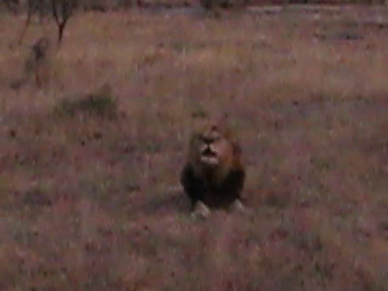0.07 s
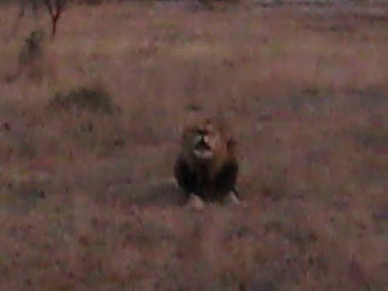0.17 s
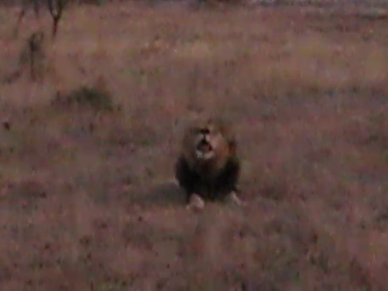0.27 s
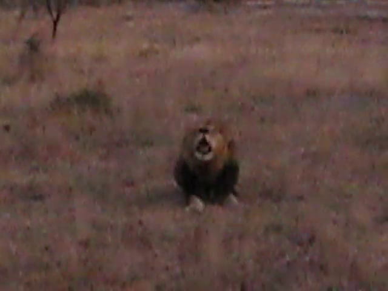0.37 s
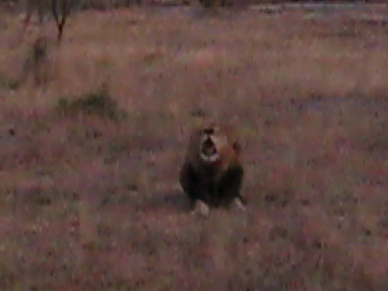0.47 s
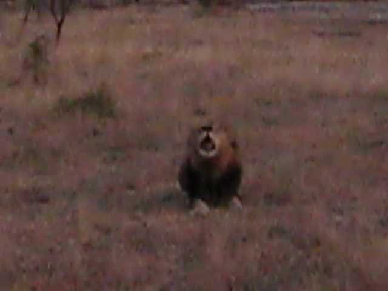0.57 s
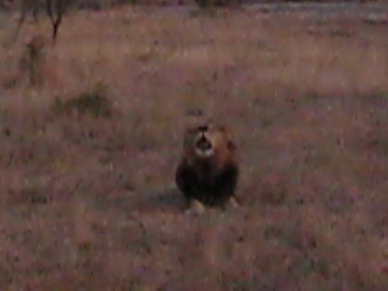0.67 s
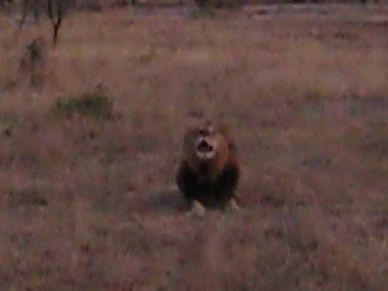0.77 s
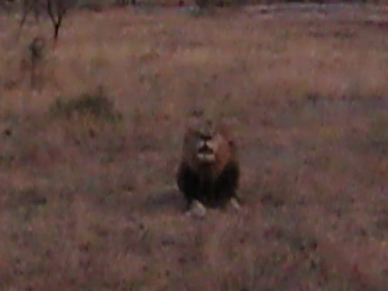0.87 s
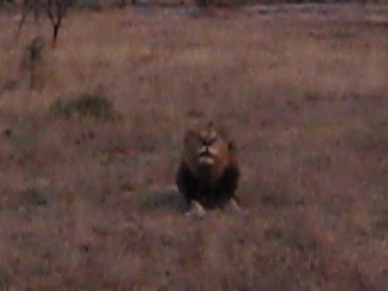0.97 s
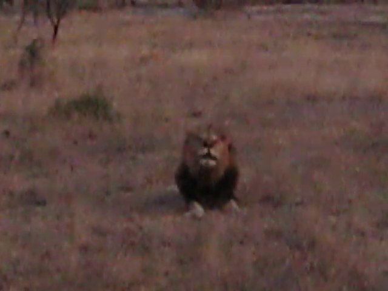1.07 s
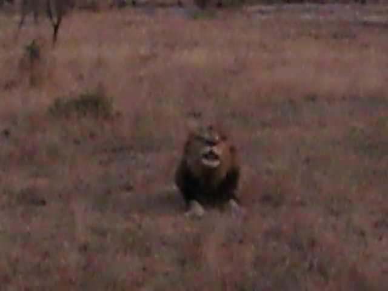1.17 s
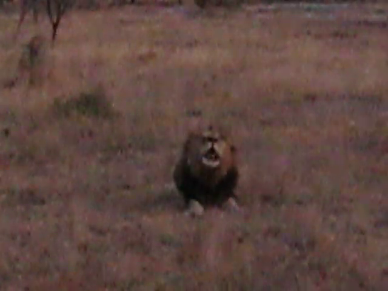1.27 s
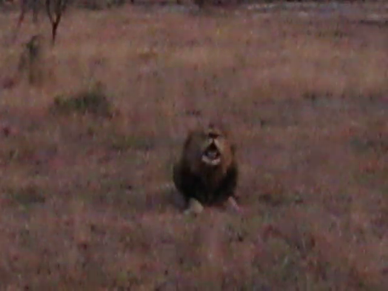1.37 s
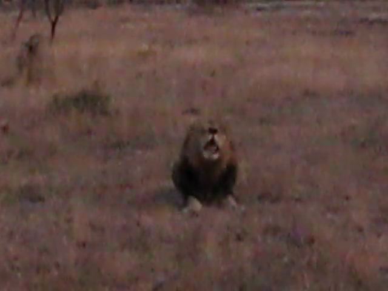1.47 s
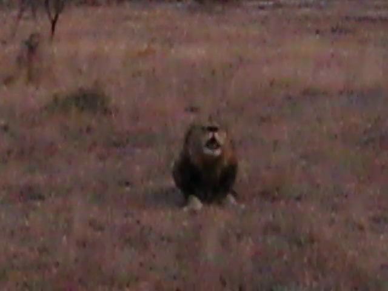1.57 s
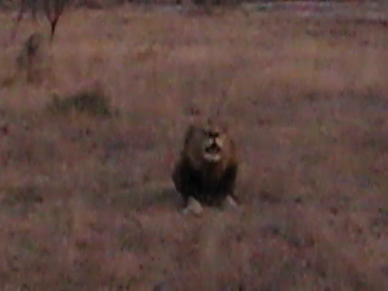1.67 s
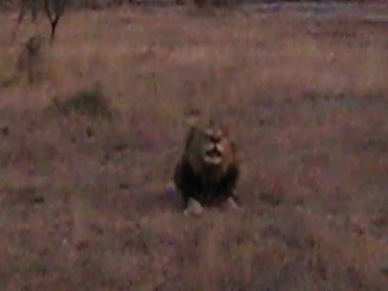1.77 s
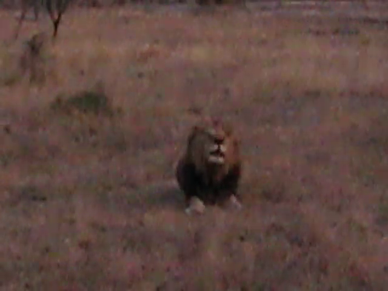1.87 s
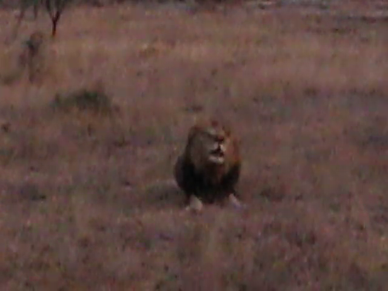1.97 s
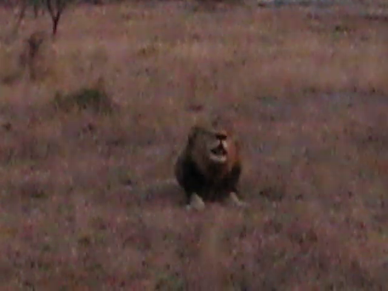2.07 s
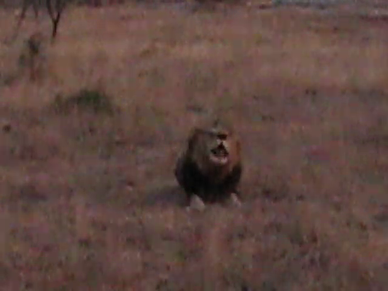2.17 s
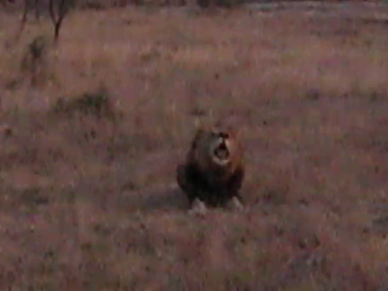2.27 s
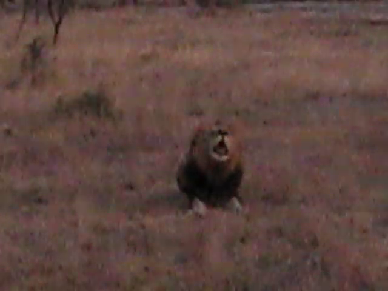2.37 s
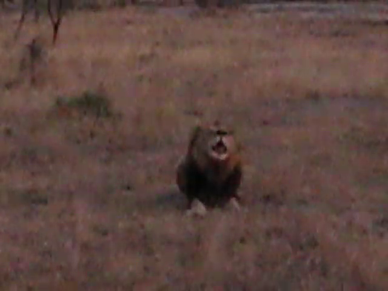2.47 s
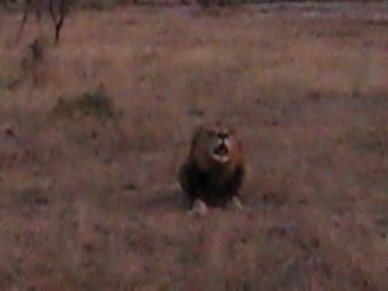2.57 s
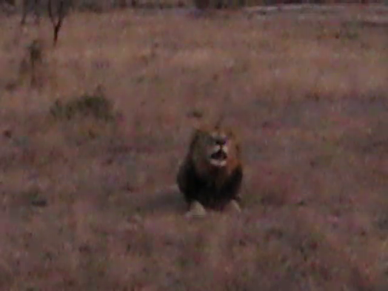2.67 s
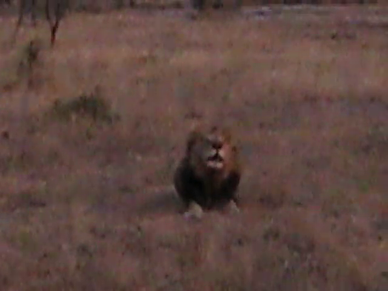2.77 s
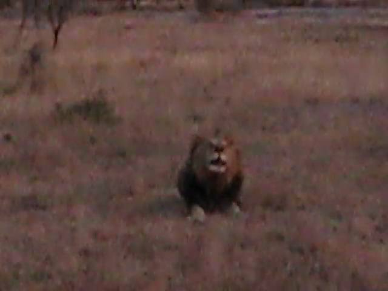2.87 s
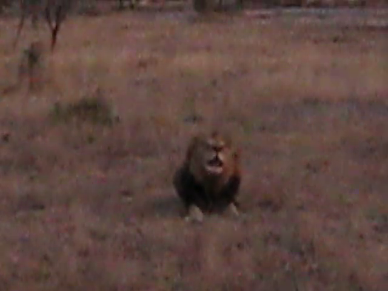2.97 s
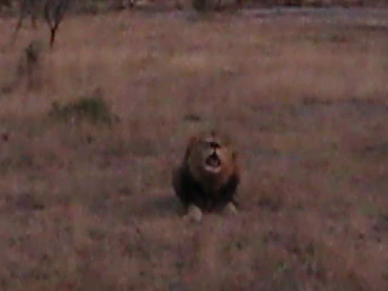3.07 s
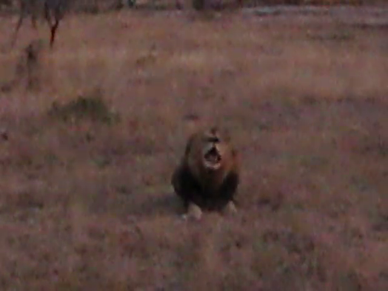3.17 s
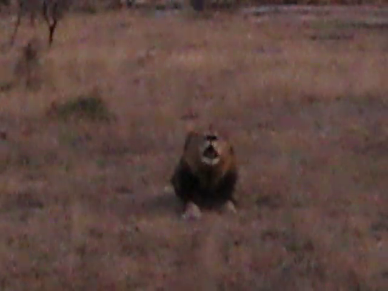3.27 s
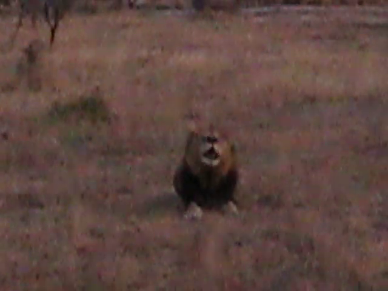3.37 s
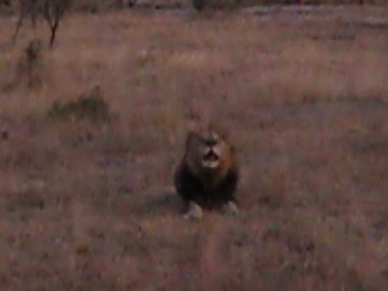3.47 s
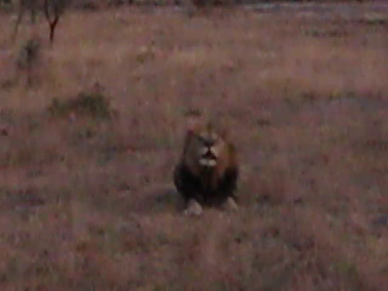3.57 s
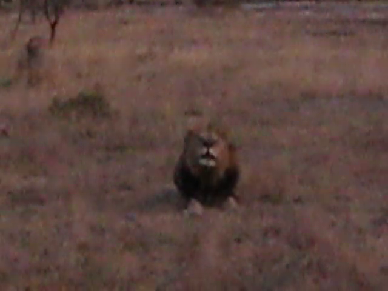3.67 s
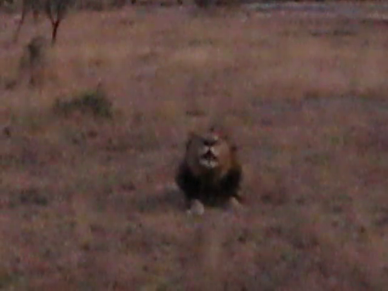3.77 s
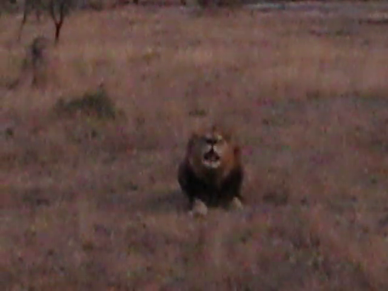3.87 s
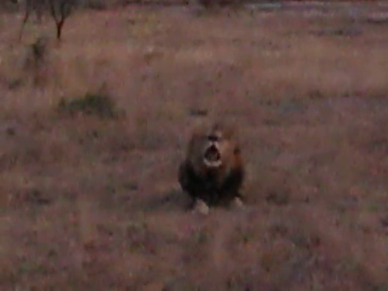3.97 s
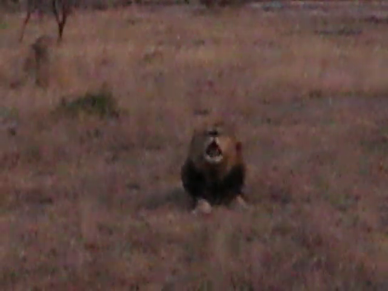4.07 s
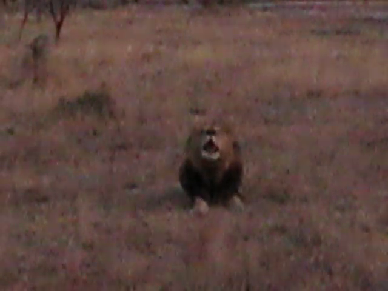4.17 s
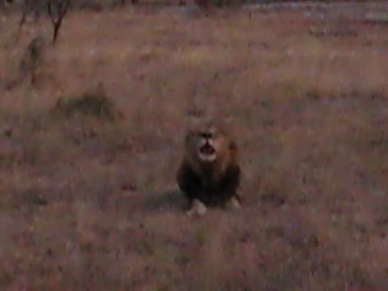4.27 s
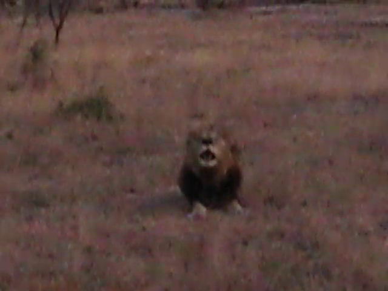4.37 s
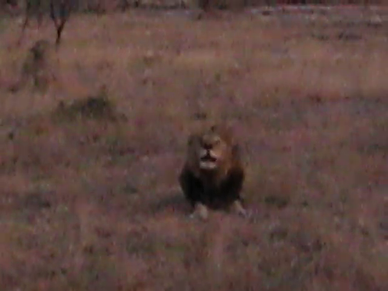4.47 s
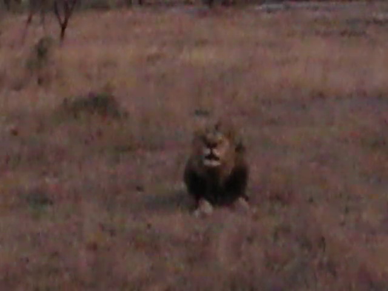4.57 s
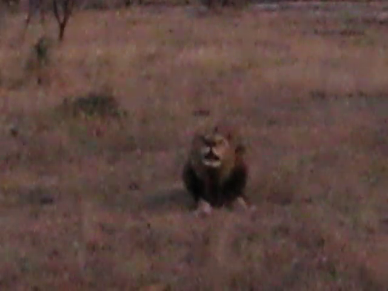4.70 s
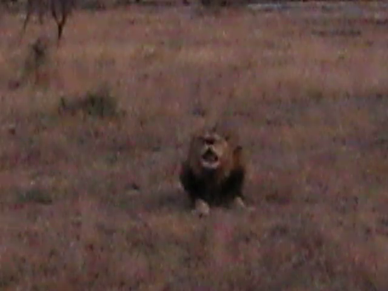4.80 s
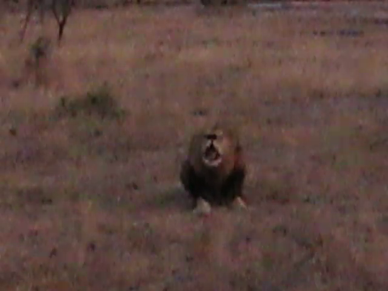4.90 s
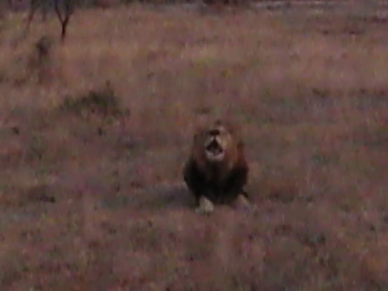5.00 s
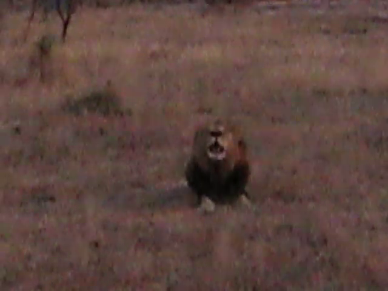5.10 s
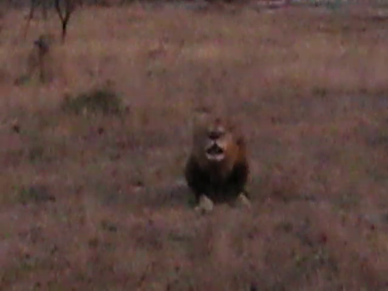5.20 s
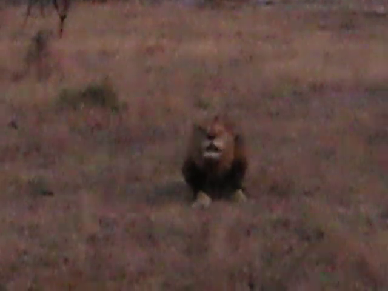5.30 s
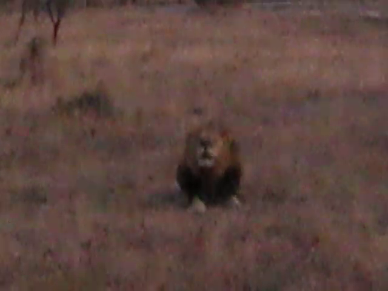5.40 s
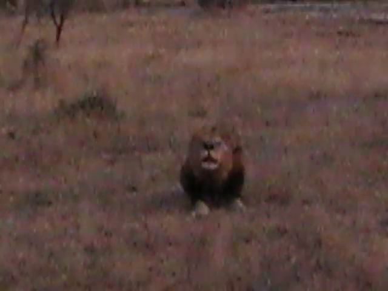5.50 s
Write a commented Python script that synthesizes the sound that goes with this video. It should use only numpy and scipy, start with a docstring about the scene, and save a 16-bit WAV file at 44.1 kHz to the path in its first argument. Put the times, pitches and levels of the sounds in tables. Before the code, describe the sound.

Raspy breath in, hard low roar, loose rattle: a lion repeats this pattern six times, the first roar longest, then draws breath once more. The voice is powerful, rough and dry, with only a faint tail from the open plain. Behind it lie quiet steady hiss, very thin high whines, a distant high trill and a few tiny ticks, in a plain single-channel pickup.

```python
"""Lion roaring in grassland

A male lion gives six grunting roars, each led by a rasping intake; a seventh intake begins at the end.
Pulsed folds and a deep, sagging chest tone start with a hard push, then give way to slowing, loose flaps.
Noise and pulses ring through a moving throat filter; decaying noise tails add faint echoes.
Beneath lie shaped hiss, thin whines, a far trill and small ticks.
"""
import sys
import numpy as np
from scipy import signal
from scipy.fft import rfft, irfft, next_fast_len
from scipy.io import wavfile
from scipy.ndimage import uniform_filter1d, map_coordinates

SR = 44100
rng = np.random.default_rng(int(sys.argv[2]) if len(sys.argv) > 2 else 0)


def transcribe(u):
    """Save the signal u as a 16-bit wav file named by the first command-line argument.

    u: samples, shape (n,) or (channels, n), limited to [-1, 1]; the rate is SR.
    q: integer samples, one column per channel.
    """
    v = np.clip(np.atleast_2d(u).T, -1, 1)
    q = np.round(v * 32767).astype(np.int16)
    wavfile.write(sys.argv[1], SR, q)


N = 244314
T = np.arange(N) / SR
SIZE = next_fast_len(N + SR, True) // 2 * 2
HZ = np.maximum(np.arange(SIZE // 2 + 1) * SR / SIZE, 1)
CUTOFF_HZ = 15800

# hiss spectrum: f/Hz, relative level/dB
AIR = [(25, -3), (90, -4), (135, 14), (200, -2), (600, -2.5), (2000, 0), (3000, -2.5), (6200, -3),
       (8700, -8), (10700, -6), (11600, -2.5), (12900, -8), (14400, -3), (15800, -2)]
AIR_DB = -48
# thin steady whines: f/Hz, half-width/Hz, level/dB
WHINES = [(7560, 30, -69), (15145, 10, -65.5)]
# something small and far away trills: start t/s, end t/s, level/dB
TRILLS = [(1.66, 2.06, -56), (3.40, 3.71, -57), (4.82, 5.36, -57.5)]
# downward slide of each trill note: from f/Hz, to f/Hz
TRILL_BAND = (6800, 6100)
# ticks and peeps in the grass: t/s, f/Hz, width/Hz, 1/e half length/s, level/dB
TICKS = [(2.7, 2500, 110, 0.011, -45.5), (2.714, 8600, 1800, 0.0027, -47), (5.277, 2120, 396, 0.0037, -44),
         (5.276, 3160, 660, 0.0039, -44.5)]

# intakes of air: fully drawn t/s, throat closes t/s, chest level/dB, throat level/dB, rasp level/dB
INTAKES = [(0.123, 0.331, -33.5, -33, -32.5), (1.18, 1.319, -37.5, -34, -34),
           (2.031, 2.209, -34.5, -33.5, -34.5), (2.946, 3.080, -38.5, -34, -35),
           (3.763, 3.938, -41.5, -34.5, -37.5), (4.695, 4.832, -39.5, -35.5, -38),
           (5.570, 5.700, -34, -32.5, -36)]
# intake slopes: chest, throat, rasp [dB/s]
SWELL_DB_PER_S = (193, 170, 270)
HOLD_DB_PER_S = (11, 26.5, 2)
SHUT_DB_PER_S = (252, 566, 550)

# roars: start t/s, hardest push t/s, folds lose their beat t/s, release t/s,
# pressed f/Hz, settled f/Hz, f at the break/Hz,
# relative chest level/dB, throat level/dB, rasp level/dB, overtone level/dB
ROARS = [(0.404, 0.428, 0.7, 0.83, 131, 150, 129.9, 1, 0, -0.5, -29),
         (1.389, 1.412, 1.590, 1.674, 132.6, 144.1, 131, 0, 0, -0.5, -35),
         (2.276, 2.302, 2.454, 2.588, 132.3, 141.7, 134.9, -0.5, -0.5, 1, -32),
         (3.144, 3.187, 3.26, 3.404, 125.2, 141.1, 138.9, 0, 0.5, -0.5, -23),
         (3.997, 4.049, 4.215, 4.340, 124, 141, 138.2, -0.5, 0, 0.5, -23),
         (4.895, 4.942, 5.06, 5.174, 124, 142.2, 127.2, -0.5, 0.5, 0, -25.5)]
# envelopes shared by all roars: level/dB at start, push, settled, break, mid rattle, release; fall/(dB/s)
CHEST_ENVELOPE = (-24.5, -17.5, -16, -21, -28, -29.5, 212)
THROAT_ENVELOPE = (-20.5, -15.5, -22, -24, -27, -31.5, 236)
RASP_ENVELOPE = (-33.5, -21, -28.5, -30, -27, -34.5, 280)
ATTACK_DB_PER_S, SETTLE_S = 2500, 0.031
# brief dip in the first, longest roar: t/s, 1/e half length/s, level change/dB
FALTER = (0.603, 0.022, -7.5)
# pitch leaps after the push, sags, and hovers once the beat is lost
PITCH_LEAP_S, SAG_POWER, LOOSE_HZ, LAST_HZ = 0.03163, 1.6, 139.2, 128.17
# overtones of the pressed voice: multiple of the pitch, relative level/dB
OVERTONES = [(2, -8), (3, 5), (4, -11.5), (5, -4.5), (6, -15), (9, -12), (11, -12)]
# side tones of the unsteady folds, and one stretch of the third harmonic (2.33 s):
# start t/s, end t/s, from f/Hz, to f/Hz, level/dB
SIDE_TONES = [(0.578, 0.652, 181, 185, -25.5), (0.617, 0.65, 515, 470, -24.5),
              (0.587, 0.697, 280, 251, -30.5), (0.663, 0.72, 351, 322, -30), (0.719, 0.79, 245, 356, -27.5),
              (1.525, 1.596, 177.7, 195, -25.5), (2.33, 2.466, 425, 400, -31.5),
              (3.137, 3.23, 215.7, 197, -27), (4.22, 4.302, 334, 254.4, -33.5),
              (5.06, 5.125, 305, 350.7, -36)]

# single hard slaps of the folds: t/s, relative throat level/dB, relative rasp level/dB
SLAPS = [(0.253, -22.5, -32), (0.274, -24.5, -30), (0.328, -19.5, -19.5), (0.412, -17, -43),
         (0.427, -22, -38), (1.187, -23.5, -31.5), (2.152, -20.5, -23.5), (2.181, -15, -22.5),
         (2.31, -26, -26), (3.032, -24, -45), (3.061, -48, -25.5), (3.089, -26, -29.5), (3.171, -24, -35),
         (3.266, -21, -38), (4.017, -19, -48), (4.28, -22, -34), (4.807, -28, -29.5), (4.937, -14, -44),
         (5.048, -22, -44)]
# flaps ending each roar: last hard flap t/s, relative throat level/dB, relative rasp level/dB
FLAP_RUNS = [(0.839, -1.5, -1), (1.687, 1, 2.5), (2.589, 1.5, 2), (3.402, 1.5, -2), (4.337, 0.5, 0.5),
             (5.174, -1.5, -4.5)]
# gap before the last hard flap; each earlier gap is shorter by the share
LAST_GAP_S, GAP_SHARE = 0.0305, 0.88
# course along a run: relative level/dB at the break, middle, last hard flap, feeble flap after it
FLAP_THROAT_DB = (-25.5, -18.5, -21, -35)
FLAP_RASP_DB = (-25.5, -22.5, -29.5, -38)

# source spectra: f/Hz, relative level/dB
PULSE_COLOUR = [(100, -40.5), (200, 2.5), (280, -7), (400, -2.5), (800, -11), (1200, -11), (2400, -35),
                (5000, -38), (7500, -27), (10500, -21.5), (15000, -31)]
RASP_COLOUR = [(100, 11.5), (190, 13.5), (280, 8), (450, 2), (800, 2.5), (1200, 1), (2400, -5),
               (5000, -12.5), (7500, -13), (10500, -18.5), (15000, -28)]
INTAKE_COLOUR = [(100, 20.5), (190, -3.5), (260, -9), (500, -7.5), (800, -5), (1100, -6), (1500, -4),
                 (2400, -9), (5000, -12.5), (7500, -15), (10500, -14), (15000, -34)]
FLAP_COLOUR = [(100, -10), (300, -1), (500, -5), (800, -6.5), (1150, -7.5), (1800, -6.5), (2400, -11),
               (5000, -15), (7500, -21.5), (10500, -20.5), (15000, -32)]
CHEST_COLOUR = [(25, -47), (50, -11.5), (90, -13.5), (125, -4.5), (165, 4.5), (200, -14), (260, -53),
                (500, -38)]
# throat half closed, for rattle and flaps: f/Hz, width/Hz, lift/dB
THROAT = [(316.5, 18, 10), (499.5, 27, 10), (627, 32, -18), (740, 60, 8.5), (840, 150, 0), (1077, 128, 13),
          (1290, 220, 11.5), (1530, 110, -4.5), (1670, 120, 11), (1825, 58, 10.5), (2110, 95, -9.5),
          (2400, 45, 6), (2980, 280, 7), (3810, 950, 11.5), (4197, 100, 8), (4820, 270, -5.5),
          (5100, 69, 12), (5760, 170, 7.5), (6240, 330, 5.5)]
# throat and mouth wide open, for the voice: f/Hz, width/Hz, lift/dB
OPEN_THROAT = [(368.7, 43, 14), (512, 15, 9), (601.3, 12, 11.5), (704, 72, 5.5), (916, 69, -11),
               (1016, 140, 6), (1169, 265, 10.5), (1290, 56, 3), (1425, 58, 9), (1602, 67, -26),
               (1705, 377, 22), (1974, 215, 12), (2250, 124, 13), (2480, 170, 4.5), (3023, 740, 18.5),
               (3530, 620, 7.5), (4155, 880, 19.5), (5440, 2040, 19.5)]
# throat narrowed, for the intakes: f/Hz, width/Hz, lift/dB
NARROW_THROAT = [(360.5, 87, 17.5), (702, 59, 9), (820, 32, -10), (1027, 520, 12), (1335, 370, 5.5),
                 (1680, 48, 11), (2395, 65, 5), (2650, 110, -8), (3074, 500, 13), (3410, 64, 9.5),
                 (4120, 830, 17), (5100, 400, -2.5), (5550, 470, 8), (6100, 400, 6.5)]


def from_db(db):
    """Decibels to gain."""
    return 10 ** (np.asarray(db) / 20)


def rms_one(x):
    """Scale to unit power."""
    return x / np.sqrt(np.mean(x ** 2) + 1e-20)


def noise():
    """White noise."""
    return rng.standard_normal(N)


def band(x, low_hz, high_hz, order=2):
    """Butterworth band-pass."""
    edges_hz = [low_hz, min(high_hz, SR / 2 - 1000)]
    return signal.sosfilt(signal.butter(order, edges_hz, "band", fs=SR, output="sos"), x + 1e-18)


def drift(rate_hz):
    """Random wander of unit power, 6 dB down at rate_hz."""
    coarse = 2 ** 14
    coarse_hz = np.arange(coarse // 2 + 1) / T[-1]
    spectrum = rfft(rng.standard_normal(coarse)) / (1 + (coarse_hz / rate_hz) ** 2)
    return np.interp(T, np.linspace(0, T[-1], coarse), rms_one(irfft(spectrum)))


def even(x, size=1100):
    """Hold the level steady over `size` samples, keeping the faster pulses within."""
    power = uniform_filter1d(uniform_filter1d(x ** 2, size), size)
    return x / np.sqrt(power.clip(1e-12))


def colour(x, spectrum, resonances=()):
    """Causal (minimum-phase) filter: a smooth spectrum lifted by resonances."""
    hz, db = np.transpose(spectrum)
    db = np.interp(np.log(HZ), np.log(hz), db)
    for centre_hz, width_hz, lift_db in resonances:
        db = db + lift_db / (1 + (2 * (HZ - centre_hz) / width_hz) ** 2)
    cepstrum = irfft(np.log(from_db(db)))[:SIZE // 2]
    cepstrum[1:] *= 2  # fold to minimum phase
    return irfft(rfft(x, SIZE) * np.exp(rfft(cepstrum, SIZE)))[:N]


def wavering(pitch_hz, width_hz):
    """Turbulence ringing in one narrow resonance, whose centre may move."""
    turn = 2 * np.pi * np.cumsum(pitch_hz * np.ones(N)) / SR
    return drift(width_hz) * np.cos(turn) + drift(width_hz) * np.sin(turn)


def registers(x, split_hz=2400):
    """The hollow lower part and the rasping upper part of a throat sound."""
    return band(x, 147, split_hz, order=4), band(x, split_hz, CUTOFF_HZ, order=4)


def jaw(spans, first, last, wobble=.012):
    """Relative shift of the resonances, gliding from first to last within each (start, end) span."""
    return np.interp(T, np.ravel(spans), [first, last] * len(spans)) + wobble * drift(7.03)


def tract(x, spectrum, resonances, opening, patchy_db=3.5, patchy_hz=22, count=12):
    """Moving throat filter: a wider jaw raises every resonance, and each region flickers on its own."""
    samples = np.arange(N)
    stretched = np.cumsum(1 + opening - opening.mean())
    # warp time, filter, unwarp: the fixed resonances then move
    warped = map_coordinates(x, [np.interp(samples, stretched, samples)], order=3)
    ringing = colour(warped, spectrum, resonances)
    whole = rfft(map_coordinates(ringing, [stretched], order=3), SIZE)
    centres = np.log(np.geomspace(300, 11000, count))
    out = np.zeros(N)
    for share in np.eye(count):
        region = irfft(whole * np.interp(np.log(HZ), centres, share))[:N]
        out += region * from_db(patchy_db * drift(patchy_hz))
    return out


def background(trill_hz=64.0):
    """Filtered-noise hiss, thin whines, a far trill of sliding notes and short noise ticks."""
    out = from_db(AIR_DB) * rms_one(colour(noise(), AIR))
    for hz, half_width_hz, db in WHINES:
        out += from_db(db) * wavering(hz, half_width_hz)
    note = trill_hz * T % 1
    turn = 2 * np.pi * np.cumsum(np.interp(note, [0, 1], TRILL_BAND)) / SR
    trill = rms_one(np.sin(turn) * np.sin(np.pi * note) ** 2 * from_db(2 * drift(30)))
    for start, end, db in TRILLS:
        fade = np.interp(T, [start, start + 0.06, end - .04, end], [0, 1, 1, 0])
        out += from_db(db) * trill * fade
    for s, hz, width_hz, length_s, db in TICKS:
        tick = rms_one(band(noise(), hz - width_hz / 2, hz + width_hz / 2))
        out += from_db(db) * tick * np.exp(-((T - s) / length_s) ** 2)
    return out


def intake_gains():
    """Chest, throat and rasp gains of the intakes: a swell, a hold and a quick shutting."""
    out = np.zeros((3, N))
    for full, end, *levels_db in INTAKES:
        for k, db in enumerate(levels_db):
            hold_db = HOLD_DB_PER_S[k] * (T.clip(full, end) - full)
            swell_db = SWELL_DB_PER_S[k] * (full - T).clip(0)
            shut_db = SHUT_DB_PER_S[k] * (T - end).clip(0)
            out[k] += from_db(db + (hold_db - swell_db - shut_db).clip(-120))
    return out


def intakes(flutter_db=2.5, flutter_hz=70, level_db=-2.5, hum_hz=160, hum_db=-2, rumble_db=-6,
            from_hz=880, to_hz=1200, hollow_db=-8, wheeze_hz=4130, wheeze_db=-9, lead_s=0.1):
    """Air drawn past slack folds: they hum and wheeze, and a mouth resonance rises as the jaw opens."""
    chest, throat, rasp = intake_gains()
    spans = [(full - lead_s, end) for full, end, *_ in INTAKES]
    opening = jaw(spans, first=-0.038, last=.02)
    flutter = from_db(flutter_db * drift(flutter_hz))
    low, high = registers(tract(noise() * flutter, INTAKE_COLOUR, NARROW_THROAT, opening))
    mouth_hz = np.interp(opening, [opening.min(), opening.max()], [from_hz, to_hz])
    hollow = from_db(hollow_db) * even(wavering(mouth_hz, 63))
    whistle = even(wavering(wheeze_hz * (1 + opening), 220) * flutter)
    wheeze = from_db(wheeze_db + 0.82 * drift(24)) * whistle
    hum = from_db(hum_db) * even(wavering(hum_hz, 17.7))
    rumble = from_db(rumble_db) * even(colour(noise(), CHEST_COLOUR))
    air = throat * (even(low) + hollow) + rasp * (even(high) + wheeze)
    return chest * (hum + rumble) + from_db(level_db) * air


def echo_tail(t60_s, low_hz, high_hz):
    """Unit-energy band of decaying noise with a soft onset."""
    decay = from_db(-60 * T / t60_s)
    onset = 1 - np.exp(-T * 30 / t60_s)
    echoes = band(noise() * decay * onset, low_hz, high_hz)
    return echoes / np.linalg.norm(echoes)


def plain(x, near_db=-18, near_t60_s=0.12, far_db=-42, far_t60_s=1.34, boom_db=-58):
    """Ground and grass scatter briefly; far bushes send back a faint, low tail."""
    near = from_db(near_db) * echo_tail(near_t60_s, 190, 5800)
    far = from_db(far_db) * echo_tail(far_t60_s, 145.0, 1100)
    boom = from_db(boom_db) * echo_tail(far_t60_s, 89, 160)
    return signal.fftconvolve(x, near + far + boom)[:N]


def roar_spans(tail_s=0.084):
    """Start and end of each roar, with its dying tail."""
    return [(start, end + tail_s) for start, _, _, end, *_ in ROARS]


def flap_runs(count=7):
    """Ever slower flaps ending each roar, the last one feeble: rows of t/s, throat/dB, rasp/dB."""
    before_last = np.append(0, np.cumsum(LAST_GAP_S * GAP_SHARE ** np.arange(count)))
    rows = []
    for (_, _, loose, *_), (last, throat_db, rasp_db) in zip(ROARS, FLAP_RUNS):
        feeble = last + LAST_GAP_S / GAP_SHARE
        stages = [loose, (loose + last) / 2, last, feeble]
        for s in [feeble, *(last - before_last)]:
            if s > loose:
                low_db = throat_db + np.interp(s, stages, FLAP_THROAT_DB)
                high_db = rasp_db + np.interp(s, stages, FLAP_RASP_DB)
                rows.append((s, low_db, high_db))
    return rows


def flaps(decay_s=0.0068, snap=1.0, throat_db=1.0, rasp_db=1.5, low_cut_hz=300, patchy_db=1.66):
    """Each slap of the folds is a click and a short burst of air that ring the throat."""
    burst = even(band(noise(), low_cut_hz, CUTOFF_HZ), size=90)
    drive = np.zeros((2, N))
    age = np.arange(SR // 20) / SR
    for s, low_db, high_db in SLAPS + flap_runs():
        at = round(s * SR)
        puff = burst[at:at + len(age)] * np.exp(-age / decay_s)
        puff[0] += snap
        drive[:, at:at + len(age)] += from_db([[low_db + throat_db], [high_db + rasp_db]]) * puff
    # scale each register so that a steady stream of air would have unit power
    steady = registers(colour(burst, FLAP_COLOUR, THROAT))
    opening = jaw(roar_spans(), first=0.029, last=-0.018)
    out = np.zeros(N)
    for k in range(2):
        ringing = registers(tract(drive[k], FLAP_COLOUR, THROAT, opening, patchy_db))[k]
        out += ringing / np.std(steady[k])
    return out


def roar_gain(envelope, level_column):
    """One gain curve for all roars: sharp attack, push, settled tone, rattle, release."""
    *stage_db, release_db_per_s = envelope
    out = np.zeros(N)
    for row in ROARS:
        start, push, loose, end = row[:4]
        stages = [start, push, push + SETTLE_S, loose, (loose + end) / 2, end]
        edges_db = ATTACK_DB_PER_S * (start - T).clip(0) + release_db_per_s * (T - end).clip(0)
        out += from_db(row[level_column] + np.interp(T, stages, stage_db) - edges_db.clip(0, 120))
    return out


def fold_pitch():
    """Low while pressed, a leap as the folds settle, then an ever faster sag until they lose their beat."""
    points, share = [], np.linspace(0, 1, 5)
    for _, push, loose, end, pressed_hz, settled_hz, break_hz, *_ in ROARS:
        settled = push + PITCH_LEAP_S
        sag_s = settled + (loose - settled) * share
        sag_hz = settled_hz + (break_hz - settled_hz) * share ** SAG_POWER
        points += [(push, pressed_hz), *zip(sag_s, sag_hz)]
        points += [((loose + end) / 2, LOOSE_HZ), (end, LAST_HZ)]
    return np.interp(T, *np.transpose(points))


def voice(cycles, pitch, pressed, opening, shimmer_db=2.5, slip=0.036, pressed_air_db=-9,
          eased_air_db=-1, closing=0.73, air_from_hz=520):
    """Regular beating: an uneven closure and an air puff per cycle, breathier as the push eases."""
    slipping = np.maximum.accumulate(cycles + slip * drift(90))
    closures = np.diff(np.floor(slipping), prepend=0) * np.sqrt(SR / pitch)
    closures = band(closures, 110, 1550) * from_db(shimmer_db * drift(82))
    puffs = rms_one(noise() * np.exp(-closing * (cycles % 1)) * from_db(shimmer_db * drift(190)))
    air_db = eased_air_db + (pressed_air_db - eased_air_db) * pressed
    air = from_db(air_db) * band(puffs, air_from_hz, SR / 2, order=1)
    low, high = registers(tract(closures + air, PULSE_COLOUR, OPEN_THROAT, opening))
    return even(low), even(high)


def rattle(opening, flap_hz=62, unevenness=.3, closing=0.77, size_db=2.5):
    """Slack folds flap slowly and unevenly, chopping the air into bursts; lower and upper register."""
    cycles = np.cumsum(flap_hz * np.exp(unevenness * drift(40))) / SR
    bursts = noise() * np.exp(-closing * (cycles % 1)) * from_db(size_db * drift(50))
    low, high = registers(tract(bursts, RASP_COLOUR, THROAT, opening))
    return even(low), even(high)


def roars(jitter=.012, broken_jitter=0.0597, push_s=0.018, held_db=-13, voice_db=-2.5, rattle_db=-4,
          rumble_db=-22, broken_rumble_db=-8, growl_db=-19):
    """A deep chest tone under the pulsed voice, which gives way to a rattle as the folds lose their beat."""
    falter_s, half_s, dip_db = FALTER
    falter = from_db(dip_db * np.exp(-((T - falter_s) / half_s) ** 2))
    chest = roar_gain(CHEST_ENVELOPE, 7) * falter
    throat = roar_gain(THROAT_ENVELOPE, 8) * np.sqrt(falter)
    rasp = roar_gain(RASP_ENVELOPE, 9)
    # 0 while the folds beat, 1 once they flap
    broken = np.zeros(N)
    for _, _, loose, end, *_ in ROARS:
        broken += np.interp(T, [loose - .025, loose + 0.021, end + .15, end + .2], [0, 1, 1, 0])

    pitch = fold_pitch() * (1 + (jitter + broken_jitter * broken) * drift(69.2))
    cycles = np.cumsum(pitch) / SR
    tone = np.sqrt(2) * np.cos(2 * np.pi * (cycles - .1)) * from_db(2.0 * broken * drift(35))
    rumble_gain = from_db(rumble_db + (broken_rumble_db - rumble_db) * broken)
    rumble = rms_one(colour(noise(), CHEST_COLOUR)) * rumble_gain
    # unequal alternate cycles growl between the first two harmonics
    growl = from_db(growl_db) * wavering(pitch * 3 / 2, 4.8)

    # overtones stand out at the hardest push and linger faintly while the beat holds
    pressed, push_gain = np.zeros(N), np.zeros(N)
    for _, push, loose, *_, overtone_db in ROARS:
        bump = np.exp(-((T - push) / push_s) ** 2)
        held = np.interp(T, [push, push + push_s, loose], [0, 1, 0])
        pressed += bump
        push_gain += from_db(overtone_db) * (bump + from_db(held_db) * held)
    overtones = np.zeros(N)
    for k, db in OVERTONES:
        partial = np.sqrt(2) * np.cos(2 * np.pi * round(k) * (cycles - .05))
        overtones += from_db(db + 0.5 * drift(25)) * partial
    ringing = push_gain * overtones * chest / (chest + 0.01)  # gated by the chest envelope

    opening = jaw(roar_spans(), first=0.026, last=-0.012)
    voice_low, voice_high = voice(cycles, pitch, pressed, opening)
    rattle_low, rattle_high = rattle(opening)
    beating_gain = from_db(voice_db) * np.sqrt(1 - broken.clip(0, 1))
    beating = beating_gain * (throat * voice_low + rasp * voice_high)
    flapping = from_db(rattle_db) * np.sqrt(broken) * (throat * rattle_low + rasp * rattle_high)
    return chest * (tone + rumble + growl) + ringing + beating + flapping


def side_tones(waver=0.016):
    """Short gliding tones that swell and fade within the roars."""
    out, unsteady = np.zeros(N), 1 + waver * drift(50)
    for start, end, from_hz, to_hz, db in SIDE_TONES:
        glide_hz = np.interp(T, [start, end], [from_hz, to_hz])
        turn = 2 * np.pi * np.cumsum(glide_hz * unsteady) / SR
        swell = np.sin(np.interp(T, [start, end], [0, np.pi]))
        out += from_db(db) * np.sqrt(2) * np.sin(turn) * swell
    return out


def scene():
    """The lion, his echoes and the quiet plain."""
    lion = roars() + side_tones() + intakes() + flaps()
    return (lion + plain(lion) + background())[None]


def record(dry):
    """Steep low-pass at CUTOFF_HZ."""
    return signal.sosfilt(signal.ellip(12, .1, 80, CUTOFF_HZ, fs=SR, output="sos"), dry)


dry = scene()
out = record(dry)
transcribe(out)
```